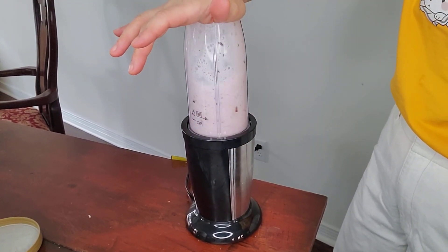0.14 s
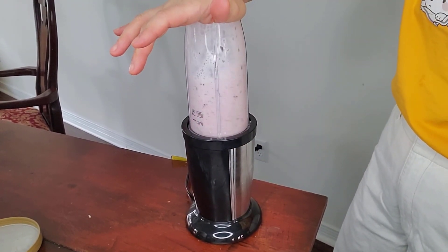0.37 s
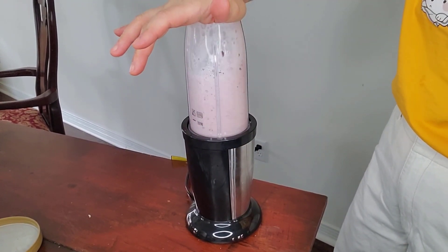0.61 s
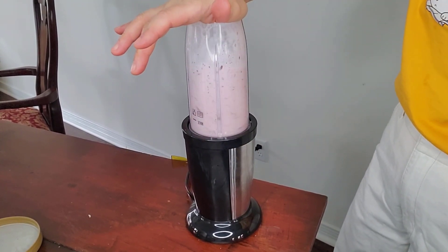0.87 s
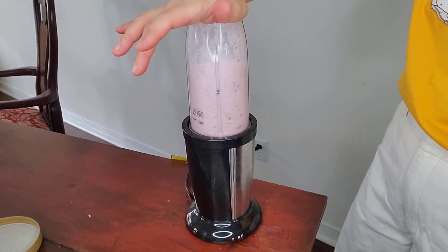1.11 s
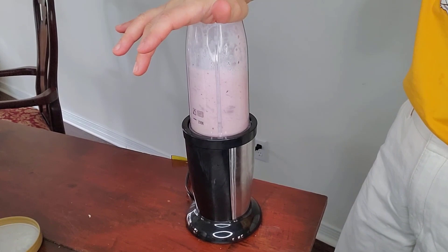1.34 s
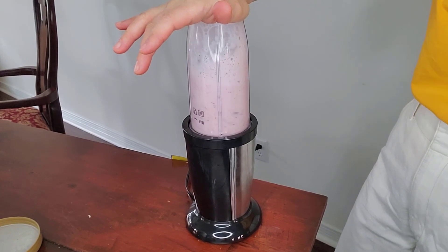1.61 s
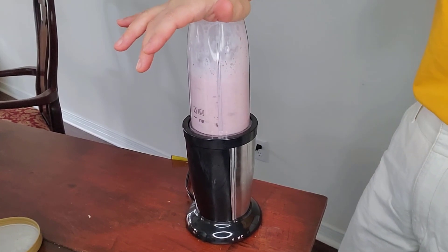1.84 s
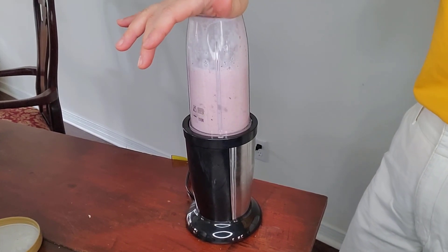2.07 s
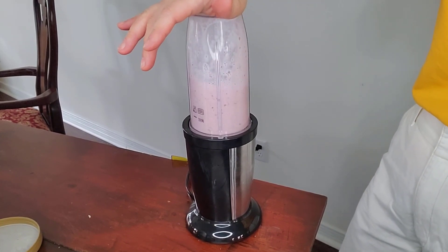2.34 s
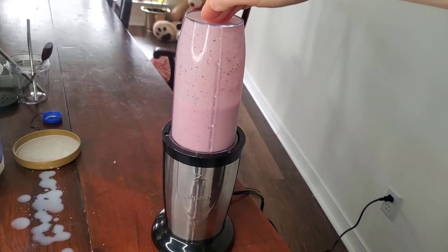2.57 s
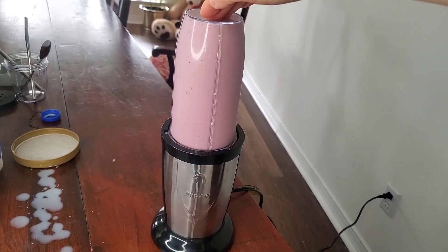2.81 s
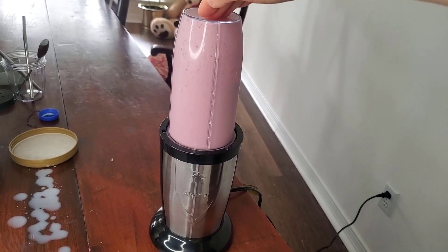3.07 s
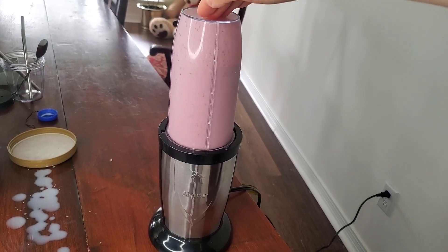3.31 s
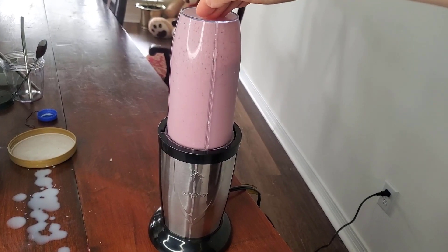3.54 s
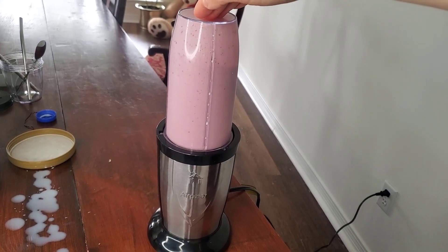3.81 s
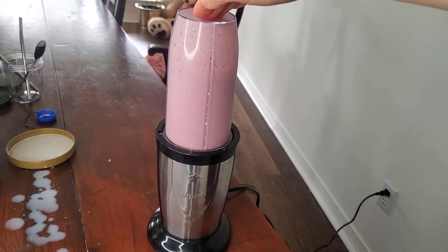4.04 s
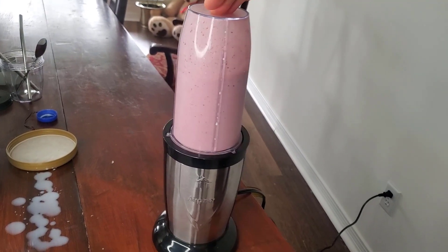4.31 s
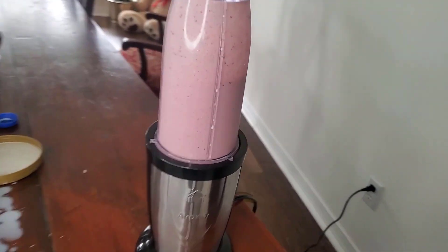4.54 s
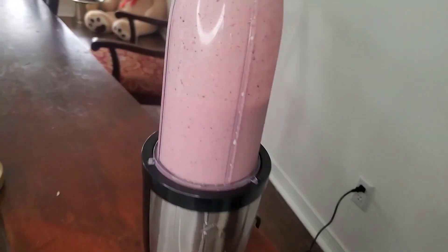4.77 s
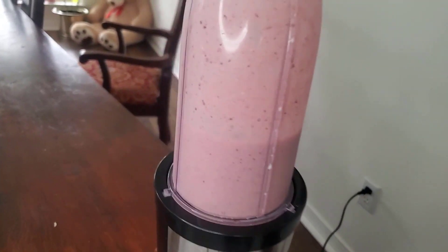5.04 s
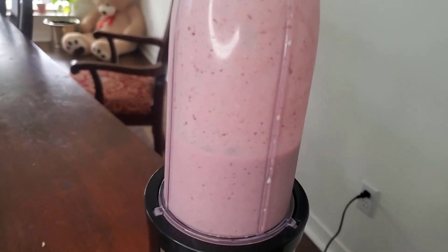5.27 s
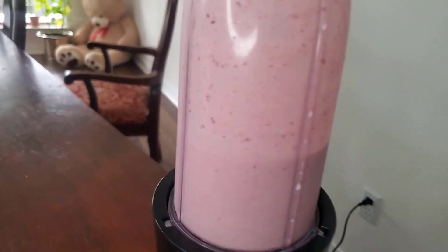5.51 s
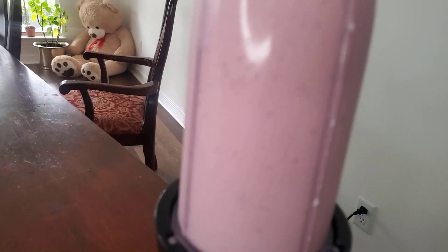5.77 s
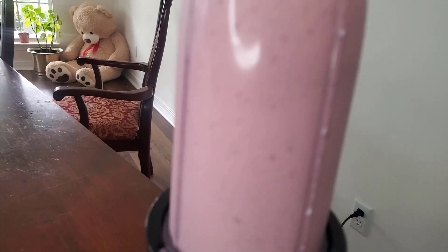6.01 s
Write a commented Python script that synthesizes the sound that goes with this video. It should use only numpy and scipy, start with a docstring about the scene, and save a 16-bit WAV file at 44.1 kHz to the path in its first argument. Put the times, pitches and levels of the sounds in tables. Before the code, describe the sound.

A small blender is already running at the start, its shrill motor whine over a buzzing hum and rough, splashy churn. Frozen lumps crack and knock irregularly against the plastic cup. Power cuts and it winds down with fainter taps. The close stereo phone perspective switches abruptly; a smoother run jerks on, pulses and fades over faint fridge hum, then another begins and continues to the end.

```python
"""A small bullet blender on a wooden table in a kitchen, heard by a phone's two microphone ports from two places in turn.
From the first place a run is already under way: the brush motor whines at twelve times the shaft speed, throbbing
at twice the mains rate, the drink churns in the plastic cup, and frozen lumps knock until the blade coasts to rest.
The sound then switches to the second place: a smoother run jerks into motion, surges and fades out over the hum
of a fridge, and a third run starts and is still going at the end."""
import sys
import numpy as np
from scipy import signal
from scipy.fft import rfft, irfft
from scipy.io import wavfile
from scipy.ndimage import uniform_filter1d

SR = 44100
rng = np.random.default_rng(int(sys.argv[2]) if len(sys.argv) > 2 else 0)


def convert_level_to_amplitude(level_db):
    """Map a level in decibels to its linear amplitude factor."""
    exponent = np.asarray(level_db, float) / 20
    return 10 ** exponent


def wav_record(signal):
    """Record a signal, one row per channel, as 16-bit PCM in the file named by sys.argv[1]."""
    frames = np.transpose(np.atleast_2d(signal))
    bounded = np.clip(frames, -1, 1)
    # unit amplitude maps onto the largest positive 16-bit level
    quanta = np.round(bounded * 32767).astype(np.int16)
    wavfile.write(sys.argv[1], SR, quanta)


N = 270226
T = np.arange(N) / SR
HZ = np.arange(N // 2 + 1) * SR / N
FULL_HZ = 260  # shaft speed that counts as 1
BUZZ_HZ = 120  # twice the mains rate


def along(rows):
    """Columns of a curve table, sample by sample."""
    s, *columns = np.transpose(rows)
    return [np.interp(T, s, c) for c in columns]


def across(rows):
    """A (frequency [Hz], value) table at every bin, straight on a log axis."""
    hz, value = np.transpose(rows)
    return np.interp(np.log(HZ + 1), np.log(hz + 1), value)


def shape(x, gain):
    """Filter by a gain for every bin."""
    return irfft(rfft(x) * gain, N)


def unit(x):
    """Scale to rms 1."""
    return x / np.sqrt(np.mean(x ** 2))


def walk(rate):
    """Smooth chance of spread 1, changing about rate times a second."""
    k = int(SR / rate)
    once = uniform_filter1d(rng.standard_normal(N), k)
    return unit(uniform_filter1d(once, k))


def ring(hz, t60):
    """One decaying mode that builds up over its first cycle, peak near 1."""
    t = T[:SR // 4]
    decay = np.exp(-np.log(1000) * t / t60)
    return np.sin(2 * np.pi * hz * t) * decay * np.minimum(hz * t, 1)


# spells of motor current: (start [s], stop [s], swing of the surge [Hz], a crest of the surge [s])
RUNS = [(-.3, 1.89, 0, 0), (2.661, 4.26, 4.5, 3.105), (5.537, 6.2, 4, 5.905)]


def live():
    """1 while current flows, else 0."""
    return sum((T >= start) & (T < stop) for start, stop, *_ in RUNS)


# speed the motor pulls towards; lumps brake it unevenly in the first run, the resting drink at each
# start: (time [s], shaft speed [Hz])
LOAD = [(0, 236), (.09, 244.5), (.22, 247.4), (.27, 244.6), (.38, 247.5), (.48, 246), (.54, 250),
        (.596, 246), (.626, 247.2), (.651, 242.6), (.756, 254), (.91, 246.3), (1, 252), (1.08, 249),
        (1.15, 253.5), (1.235, 242), (1.344, 253.5), (1.43, 245), (1.555, 254.5), (1.655, 248),
        (1.785, 257.5), (1.893, 253.8), (2.65, 246.5), (2.91, 244), (2.965, 255), (3.1, 262.5), (4.3, 263),
        (5.53, 235), (5.68, 235), (5.74, 245), (5.88, 262)]
# from switching off to rest, one entry a run: (duration [s])
COAST_S = [0.74, 0.84, .8]
SPIN_UP_S = 0.045
SURGE_HZ = 5.8  # the smooth drink slumps onto the blade and is thrown off again


def motor():
    """Share of full speed, surge in Hz, time since switching on, and the run's number."""
    start, stop, swing_hz, crest = np.transpose(RUNS)
    run = np.maximum(np.searchsorted(start, T, side="right") - 1, 0)
    age = T - start[run]
    up = 1 - np.exp(-age / SPIN_UP_S)
    down = np.clip(1 - (T - stop[run]) / np.array(COAST_S)[run], 1e-4, 1)
    speed = np.maximum(along(LOAD)[0] / FULL_HZ * up * down, 1e-4)
    surge_hz = swing_hz[run] * np.cos(2 * np.pi * SURGE_HZ * (T - crest[run]))
    surge_hz = surge_hz * np.clip(age / .15 - 1.7, 0, 1) * live()
    return speed, surge_hz, age, run


# one row a run: (whine at WHINE_HZ [dB], shaft tones at full speed [dB], mains buzz [dB], inrush at start [dB])
LEVELS = [(-16, -45, -55.5, -60), (-20, -40, -50.5, -40), (-20.5, -38.5, -51.5, -32)]
# the pull weakens as the shaft speeds up, one entry a run: (slope [dB per Hz of shaft speed])
WHINE_DB_PER_HZ = [-.5, -0.3449, -0.18]
# the whine sets in this long after each start, one entry a run: (delay [s])
CATCH_S = [0, .168, .3]
# how steeply it sets in, one entry a run: (slope [dB per s])
CATCH_DB_PER_S = [0, 2000, 40]
# the whine drops as a lump jams the blade: (time [s], level change [dB])
JAMS = [(.605, -9.5), (1.214, -5.5)]
WHINE_HZ, JAM_S = 249.9, 0.039  # shaft speed of the stated level; time constant of recovery


def whine_level(shaft_hz, age, run):
    """Level in dB of the magnetic pull: it falls with speed, sets in late and drops at jams."""
    level_db = np.transpose(LEVELS)[0, run]
    level_db = level_db + np.array(WHINE_DB_PER_HZ)[run] * (shaft_hz - WHINE_HZ)
    early_s = np.maximum(np.array(CATCH_S)[run] - age, 0)
    level_db = level_db - np.array(CATCH_DB_PER_S)[run] * early_s
    return level_db + sum(db * (T > s) * np.exp(-np.abs(T - s) / JAM_S) for s, db in JAMS)


# housing mode under the whine, one row for each place of the phone:
# (frequency [Hz], width [Hz], throb [dB], unsteadiness [dB])
SHELL = [(3048, 175, -6.5, .6), (3080, 500, -7, 3.1)]
SLOTS = 12


def whine(turns, whine_db, place):
    """Armature slots pass the poles; the pull throbs with the mains and rings a steep housing mode."""
    hz, width, throb_db, shake_db = SHELL[place]
    throb = 1 + 2 * convert_level_to_amplitude(throb_db) * np.cos(2 * np.pi * BUZZ_HZ * T)
    size = live() * throb * convert_level_to_amplitude(whine_db + shake_db * walk(100))
    pull = size * np.sin(SLOTS * turns + shake_db / 5 * walk(100))
    return np.sqrt(2) * shape(pull, 1 / (1 + 2j * (HZ - hz) / width) ** 2)


# unbalance tones of the shaft: (multiple of shaft speed, relative level [dB])
SHAFT_ORDERS = [(1, 0), (2, -6), (5, -12), (6, -10), (8, -9)]
SHAFT_POWER, COASTING_DB = 6.3, -9.5  # shaft tones grow as this power of speed and drop without current
TABLE_HZ, TABLE_WIDTH_HZ, TABLE_DB = 190.5, 24, 17.5  # table mode the shaft passes on its way up and down
INRUSH_DB_PER_S, INRUSH_REST_DB = -34, -63.5


def hum(turns, speed, age, shaft_db, buzz_db, inrush_db):
    """Unbalance at multiples of the shaft speed, field buzz, and its fifth multiple as the current rushes in."""
    shaft = sum(convert_level_to_amplitude(db + 1.9 * walk(23)) * np.sin(k * turns) for k, db in SHAFT_ORDERS)
    off_mode = 2 * (FULL_HZ * speed - TABLE_HZ) / TABLE_WIDTH_HZ
    shaft = shaft * convert_level_to_amplitude(TABLE_DB / (1 + off_mode ** 2))
    shaft = shaft * convert_level_to_amplitude(shaft_db + COASTING_DB * (1 - live())) * speed ** SHAFT_POWER
    buzz = convert_level_to_amplitude(buzz_db + 1.7 * walk(12)) * np.sin(2 * np.pi * BUZZ_HZ * T)
    fading_db = np.maximum(inrush_db + INRUSH_DB_PER_S * age, INRUSH_REST_DB)
    inrush = convert_level_to_amplitude(fading_db + 5.0 * walk(70)) * np.minimum(age / .015, 1)
    inrush = inrush * np.sin(2 * np.pi * 5 * BUZZ_HZ * T)
    return np.sqrt(2) * (shaft + live() * (buzz + inrush))


# one row a run: (churn at full speed [dB], its growth as a power of speed,
# first jolt [dB], delay of the jolt's peak after the start [s])
CHURN = [(-27, 2.16, -25, 0.32), (-22.5, 3.08, -34, 0.017), (-21, 1, -23, 0.051)]
SURGE_DB_PER_HZ = 0.09  # churn level against the surge
LINGER_S, LINGER_DB = 0.032, -30  # the churn dies away in the room


def churn_level(speed, surge_hz, age, run):
    """Amplitude of the churn: it grows with speed, jolts after each start and lingers in the room."""
    churn_db, power, jolt_db, jolt_s = np.transpose(CHURN)[:, run]
    jolt = (age / jolt_s * np.exp(1 - age / jolt_s)) ** 4
    steady = convert_level_to_amplitude(churn_db + SURGE_DB_PER_HZ * surge_hz) * speed ** power
    level = np.hypot(steady, convert_level_to_amplitude(jolt_db) * jolt)
    keep = np.exp(-1 / (LINGER_S * SR))
    return level + convert_level_to_amplitude(LINGER_DB) * signal.lfilter([1 - keep], [1, -keep], level)


# one curve for each place of the phone, broad colour of the churn: (frequency [Hz], relative level [dB per Hz])
COLOUR = [
    [(30, -44), (100, -29.5), (200, -8), (300, -13), (430, -3.5), (800, -4.5), (1300, -5), (2500, -2),
     (3600, -1.5), (5000, -2), (6000, -4), (6700, -11.5), (10000, -14.5), (15500, -22)],
    [(30, -47), (80, -47), (110, -17), (180, -15.5), (300, -9), (500, -4), (1000, -5), (2000, -4.5),
     (2600, -6.5), (3600, -1), (5200, -5), (5900, -8), (6500, -14), (10000, -18), (15500, -25.5)],
]
# one list for each place, resonances of cup and housing that stand out of it:
# (frequency [Hz], width [Hz], height [dB])
BODY = [
    [(456, 89, 5.5), (616, 65, 7), (1840, 1080, 7), (3100, 170, 10), (4200, 170, 5.5), (5600, 142, 9)],
    [(410, 65, 2), (532, 110, 0), (1287, 69, 8), (1557, 25, 6.5), (2240, 125, 7.5), (3000, 210, 7),
     (5556, 200, 7.5)],
]
# one curve for each place, sound common to both microphone ports: (frequency [Hz], share of power)
DIRECT = [
    [(60, 0.82), (300, 1), (640, 0.63), (1400, 0.37), (3000, 0.82), (6800, 0.21), (15000, 0.21)],
    [(60, 1), (300, 0.9), (640, 0.58), (1400, 0.69), (3000, 0.39), (6800, 0.091), (15000, 0.14)],
]
LOW_DB, LOW_SLOW_DB = -3, 8.5  # churn below the crossover; its extra gain at middle speeds


def churn(turns, speed, place, grit_db, beat):
    """Liquid and air torn by blade and fan, with scattered grit, sounding through cup and housing."""
    lift = sum((convert_level_to_amplitude(2 * db) - 1) / (1 + (2 * (HZ - hz) / width) ** 2) for hz, width, db in BODY[place])
    gain = convert_level_to_amplitude(across(COLOUR[place])) * np.sqrt(1 + lift)
    bright = (HZ > 3500) & (HZ < 9000)
    gain = gain / np.sqrt(np.mean(gain[bright] ** 2) * 5500 / (SR / 2))  # rms 1 in this band
    share = np.clip(across(DIRECT[place]), 0, 1)
    noise = rng.standard_normal((3, N))
    near = ports(shape(noise[0], gain * np.sqrt(share)), place)
    pan = convert_level_to_amplitude(across(PAN[place]) / 2)
    far_gain = gain * np.sqrt(1 - share)
    far = np.array([shape(noise[1], far_gain * pan), shape(noise[2], far_gain / pan)])
    low = shape(near + far, 1 / (1 + (HZ / 1500) ** 2))
    # the upper part swells suddenly as small bits pass the blade, and beats once a turn
    kicks = rng.exponential(size=N) * (rng.random(N) < 90 / SR)
    swell = signal.lfilter([1], [1, -np.exp(-1 / (0.0029 * SR))], kicks)
    rough = unit((1 + convert_level_to_amplitude(grit_db) * swell) * (1 + beat * np.cos(turns)))
    low_db = LOW_DB + LOW_SLOW_DB * np.sin(np.pi * np.minimum(speed, .97) ** 0.85)
    return rough * (near + far - low) + convert_level_to_amplitude(low_db) * low


# single lumps on cup and blade, hard while driven, often faint while coasting:
# (time [s], crack peak [dB], cup ring peak [dB])
KNOCKS = [(.059, -23, -10), (.0905, -23.5, -10.5), (.136, -21.5, -20), (.18, -22, -7.5),
          (.2373, -13.5, -6.5), (.2601, -20, -14.5), (.4128, -16, -25), (.5456, -28.5, -11),
          (.583, -20.5, -8), (.5994, -20.5, -10.5), (.9135, -23, -11.5), (.9433, -12, -22),
          (1.2045, -22.5, -4.5), (1.4047, -10.5, -15.5), (1.6, -22.5, -15), (1.7228, -19.5, -6.5),
          (2.0166, -21.5, -13), (2.036, -15.5, -33), (2.0992, -23.5, -14.5), (2.172, -18, -12),
          (2.2268, -30.5, -18.5), (2.2543, -31.5, -19), (2.2808, -35, -19.5), (2.3139, -26.5, -11.5),
          (2.363, -35.5, -30)]
# modes of the plastic cup: (frequency [Hz], relative level [dB], t60 [s])
CUP = [(1260, -9, 0.047), (1720, 1, 0.029), (1906, 6.5, 0.017), (2560, 10, 0.011), (3290, 8.5, 0.0098),
       (4350, 7, 0.0097), (5760, 0.5, 0.021)]
SMALL_PER_S, SMALL_COUNT = 11, 20  # small random lumps while the first run is driven
SMALL_CRACK_DB, SMALL_RING_DB, SMALL_SPREAD_DB = -20.5, -21.5, 2
THUD_DB = -19.5  # against the cup ring


def knocks():
    """A lump scrapes for a few milliseconds: a bright crack, the cup's modes in a new mix, a thud into the table."""
    out, t = np.zeros(N + SR), T[:SR // 4]
    bright = signal.butter(1, [3500, 12000], "bandpass", fs=SR, output="sos")
    chance_db = rng.standard_normal((SMALL_COUNT, 2)) * SMALL_SPREAD_DB + (SMALL_CRACK_DB, SMALL_RING_DB)
    small_s = (np.arange(SMALL_COUNT) + rng.random(SMALL_COUNT)) / SMALL_PER_S
    for s, crack_db, ring_db in [*KNOCKS, *np.column_stack([small_s, chance_db])]:
        # a driven blade drags the lump along; a coasting one only taps it
        contact_s = .004 if s < RUNS[0][1] else .0015
        mix, contact = rng.standard_normal(len(CUP)), rng.standard_normal(len(t))
        crack = signal.sosfilt(bright, contact * np.exp(-t / .0015))
        modes = sum(convert_level_to_amplitude(db + 1.5 * m) * ring(hz, t60) for (hz, db, t60), m in zip(CUP, mix))
        cup = signal.fftconvolve(modes, contact * np.exp(-t / contact_s))[:len(t)]
        blow = convert_level_to_amplitude(crack_db) * crack / np.abs(crack).max()
        blow = blow + convert_level_to_amplitude(ring_db) * cup / np.abs(cup).max()
        thud = convert_level_to_amplitude(ring_db + THUD_DB) * ring(430, .08)
        out[int(s * SR):int(s * SR) + len(t)] += blow + thud
    return out[:N]


# low, soft bumps at a start or in the fading churn: (time [s], peak level [dB], centre of the push [Hz])
BUMPS = [(2.668, -29, 520), (2.715, -23.5, 326), (4.66, -29.5, 600), (4.71, -35, 405), (4.78, -34, 370),
         (5.546, -24, 587.7), (5.578, -15, 320)]
# modes of the housing: (frequency [Hz], relative level [dB], t60 [s])
HOUSING = [(264, -3.5, .09), (394, 0.5, 0.052), (510, 0, .05), (600, -10.5, 0.027)]


def bumps():
    """Each push rings the housing modes, less by 47 dB for each octave away from its centre."""
    out = np.zeros(N + SR)
    for s, peak_db, push_hz in BUMPS:
        bump = sum(convert_level_to_amplitude(db - 47 * abs(np.log2(hz / push_hz))) * ring(hz, t60) for hz, db, t60 in HOUSING)
        out[int(s * SR):int(s * SR) + len(bump)] += convert_level_to_amplitude(peak_db) * bump / np.abs(bump).max()
    return out[:N]


# one curve for each place of the phone: (frequency [Hz], left minus right level [dB])
PAN = [
    [(60, -6.5), (110, 9), (200, -2.5), (380, 0), (700, 0), (1290, 0.5), (2380, 3.5), (4400, 5), (8120, -2),
     (15000, 1.5)],
    [(60, -3), (110, -5.5), (200, 3), (380, 0), (700, 2.5), (1290, 2.5), (2380, 0.5), (4400, 6.5),
     (8120, 0.5), (15000, 1.5)],
]
# one curve for each place: (frequency [Hz], phase by which left leads [rad])
LEAD = [
    [(30, 0), (1800, .3), (4400, .6), (8400, .8), (15000, 11)],
    [(30, 0), (1000, .2), (2240, .5), (3010, 2.4), (3620, 1.6), (7000, 1.4), (15000, 14)],
]


def ports(direct, place):
    """The two microphone ports differ in level and phase; their mean level in dB stays."""
    half = convert_level_to_amplitude(across(PAN[place]) / 2) * np.exp(.5j * across(LEAD[place]))
    return np.array([shape(direct, half), shape(direct, 1 / half)])


def room(x, t60, wet_db):
    """Reflections: a separate dying noise for each port."""
    t = T[:SR // 2]
    tail = rng.standard_normal((2, len(t))) * np.exp(-np.log(1000) * t / t60) * (t > .004)
    tail = tail / np.sqrt(np.sum(tail ** 2, axis=1, keepdims=True))
    return convert_level_to_amplitude(wet_db) * signal.fftconvolve(x[None], tail, axes=1)[:, :N]


# fridge compressor lines: (frequency [Hz], level [dB rms])
FRIDGE = [(96.9, -78.5), (236.9, -80), (296.1, -67), (355.3, -77.5), (414.5, -76)]
# colour of the room air: (frequency [Hz], relative level [dB per Hz])
AIR = [(18, -41.5), (30, -10), (247, -6.5), (296, -0.5), (426, -7.5), (645, -43.5), (3980, -46.5),
       (5580, -33.5), (6530, -64.5), (15000, -56)]
AIR_DB = -71
RUMBLE_DB, RUMBLE_STILL_DB, RUMBLE_SWAY_DB = -60, -74, 2.5  # table and hand on the phone


def kitchen(shaking):
    """Fridge compressor lines over low room air, and a deep rumble, alike at both ports."""
    lines = sum(convert_level_to_amplitude(db + 1.9 * walk(8)) * np.sqrt(2) * np.sin(2 * np.pi * hz * T) for hz, db in FRIDGE)
    air = shape(rng.standard_normal((3, N)), convert_level_to_amplitude(across(AIR)))
    air = convert_level_to_amplitude(AIR_DB) * unit(air[0] + 0.35 * air[1:])  # mostly shared by the ports
    deep = HZ ** 4 / (45 ** 4 + HZ ** 4) / (1 + (HZ / 90) ** 2)
    rumble = unit(shape(rng.standard_normal(N), deep))
    rumble_level = convert_level_to_amplitude(RUMBLE_SWAY_DB * walk(5)) * (convert_level_to_amplitude(RUMBLE_DB) * shaking + convert_level_to_amplitude(RUMBLE_STILL_DB))
    return lines + air + rumble_level * rumble


MOVE_S = 2.65  # the phone changes place


def scene():
    """Both places of the phone are played, and the sound switches from one to the other."""
    speed, surge_hz, age, run = motor()
    # the rotor's inertia rounds every change of speed
    shaft_hz = uniform_filter1d(FULL_HZ * speed + surge_hz, SR // 40)
    turns = 2 * np.pi * np.cumsum(shaft_hz) / SR
    whine_db = whine_level(shaft_hz, age, run)
    level = churn_level(speed, surge_hz, age, run)
    hum_db = np.transpose(LEVELS)[1:, run]
    solid = hum(turns, speed, age, *hum_db) + knocks() + bumps()
    heard = []
    # (place, grit [dB], beat depth, reflections [dB])
    for place, grit_db, beat, wet_db in ((0, -7.5, 0.082, -8), (1, -15, 0.09, -6.5)):
        near = whine(turns, whine_db, place) + solid
        walls = room(near, .25, wet_db)
        drink = level * churn(turns, speed, place, grit_db, beat)
        heard.append(ports(near, place) + walls + drink)
    start = np.clip(age / .05, 0, 1) * np.exp(-age / 0.12)  # the rumble rises briefly at a start
    return np.where(T < MOVE_S, *heard) + kitchen(np.sqrt(speed) * (1 + 3.1 * start))


def band_limit(x):
    """A steep low-pass at the top of the band."""
    return signal.sosfilt(signal.butter(12, 16080, fs=SR, output="sos"), x)


def record(dry):
    """The phone rounds the highest peaks."""
    mix = np.tanh(0.88 * dry) / 0.74
    return band_limit(mix)


dry = scene()
out = record(dry)
wav_record(out)
```